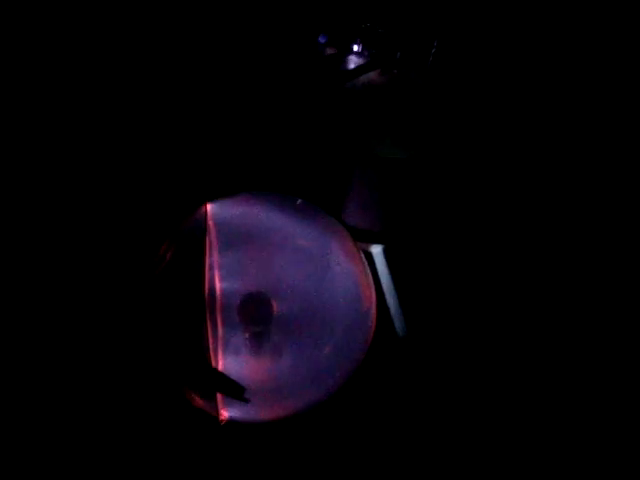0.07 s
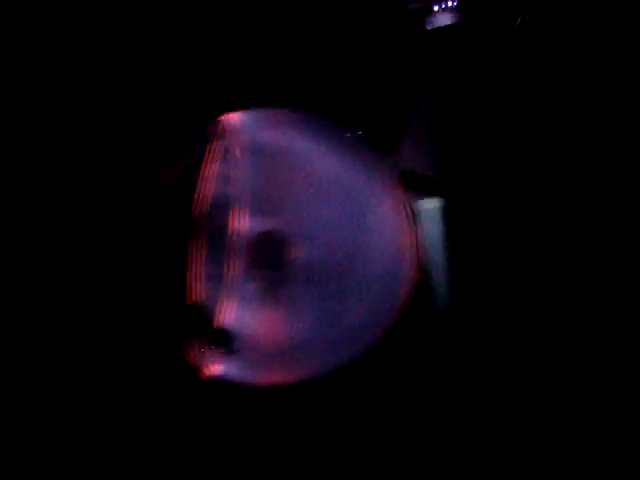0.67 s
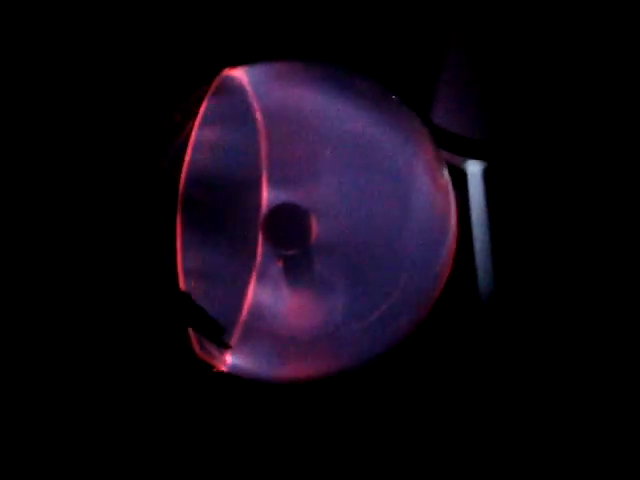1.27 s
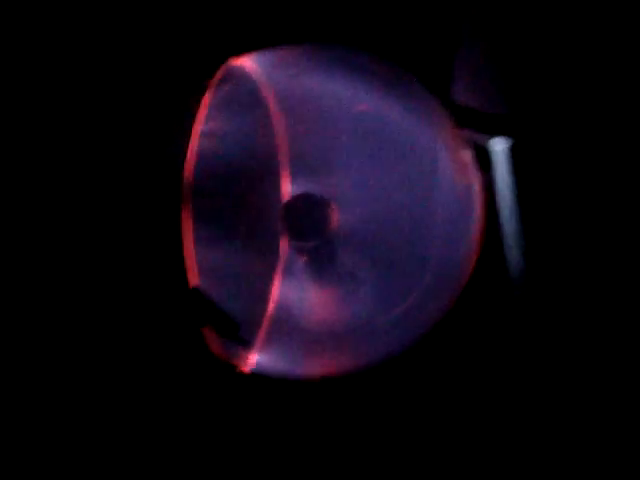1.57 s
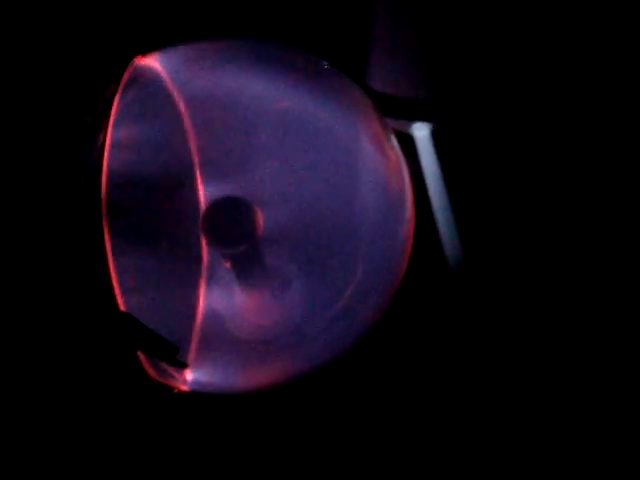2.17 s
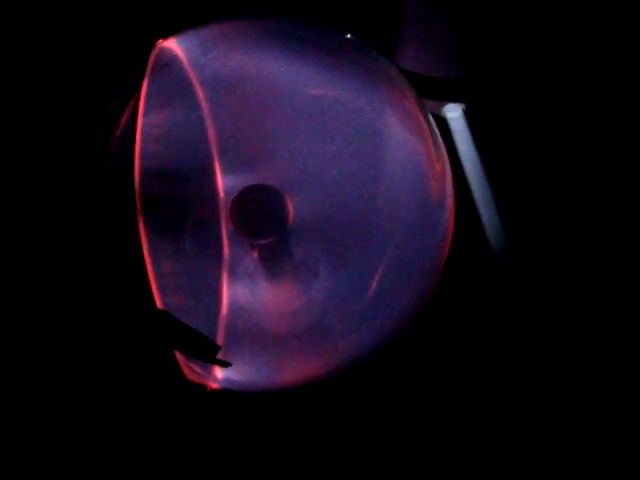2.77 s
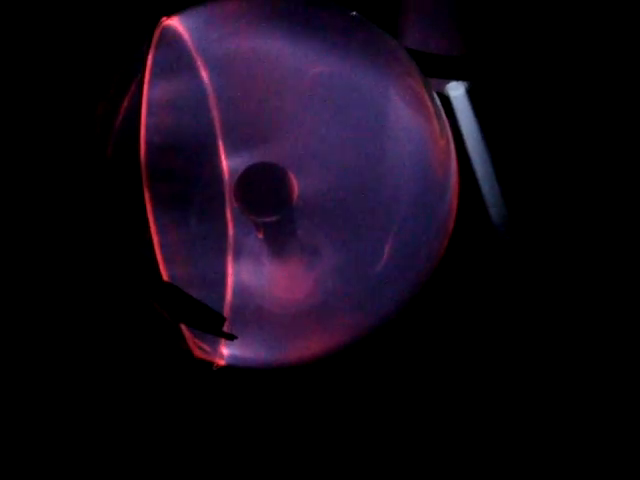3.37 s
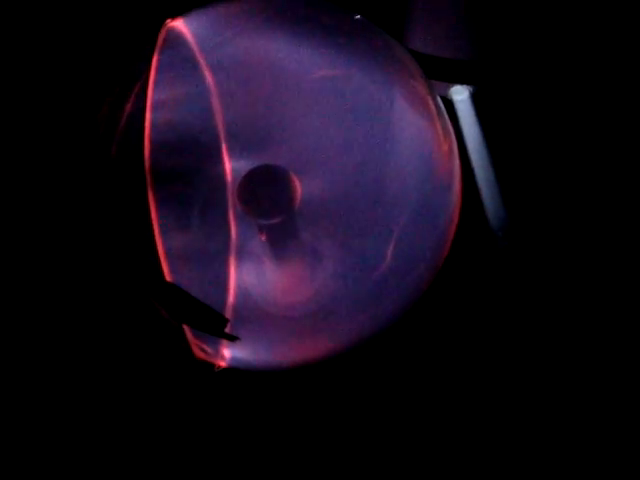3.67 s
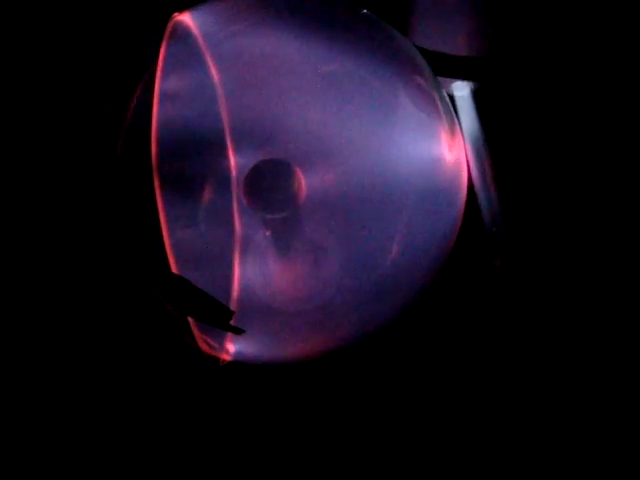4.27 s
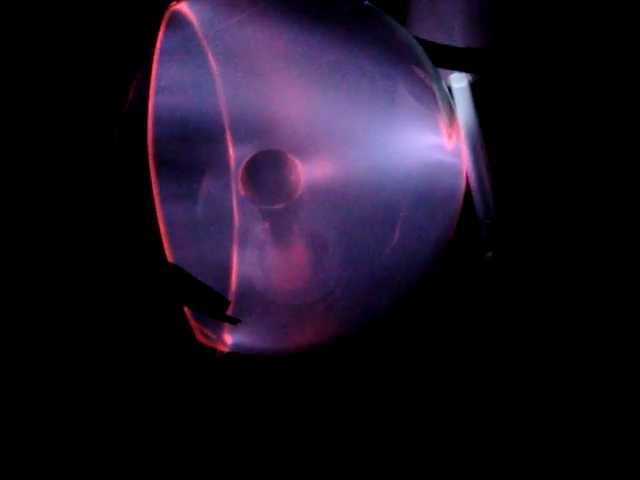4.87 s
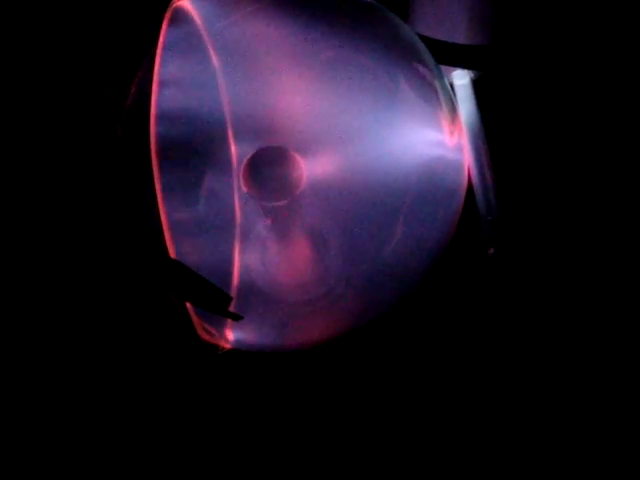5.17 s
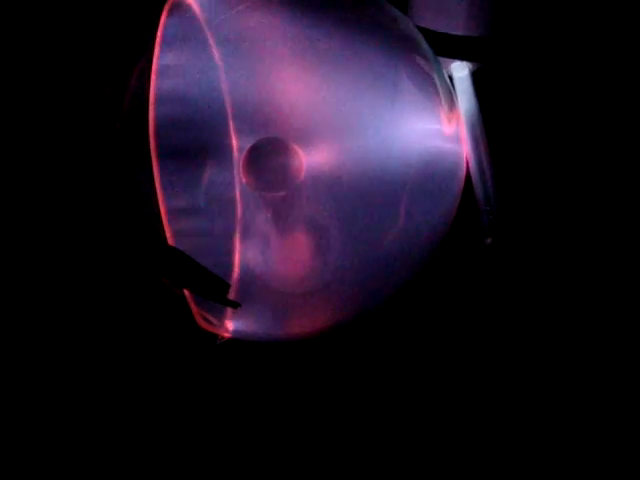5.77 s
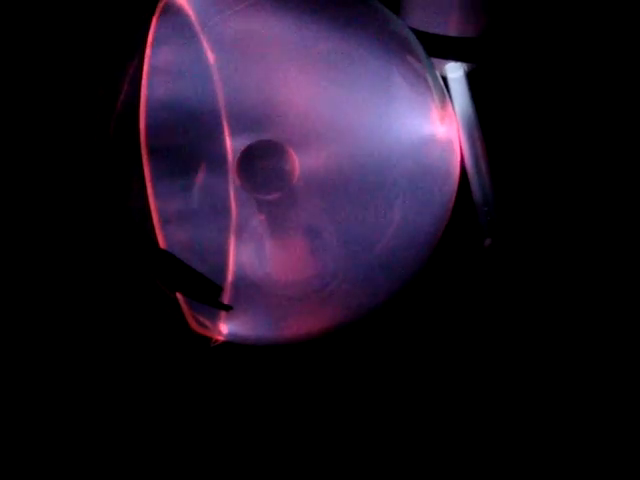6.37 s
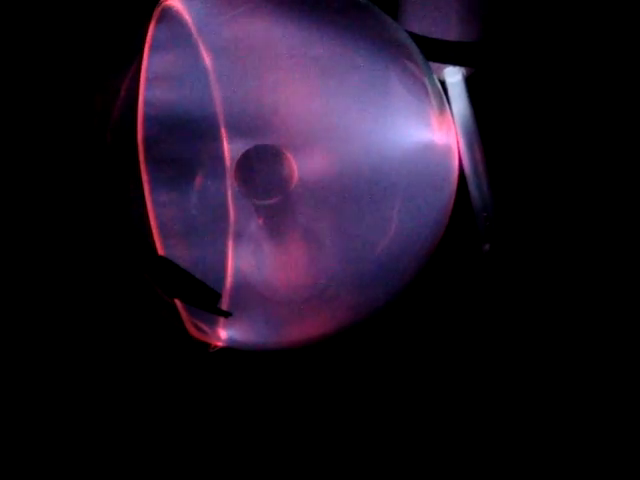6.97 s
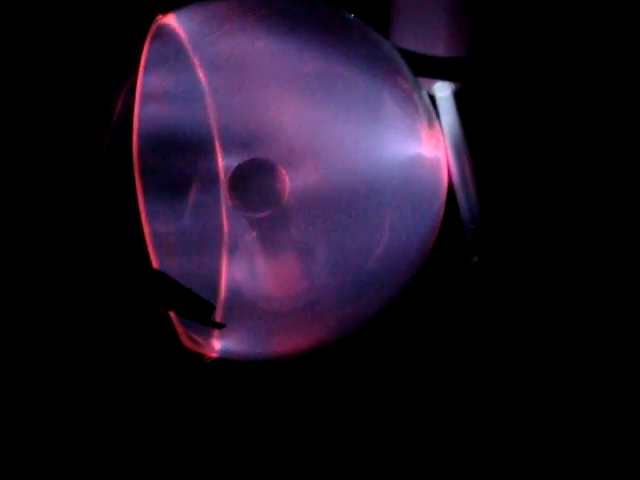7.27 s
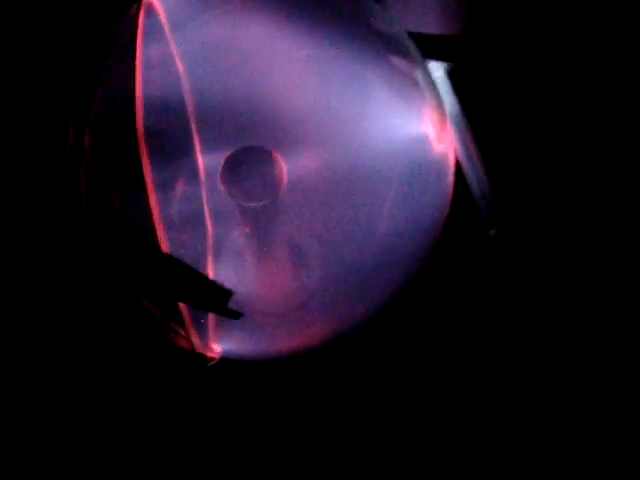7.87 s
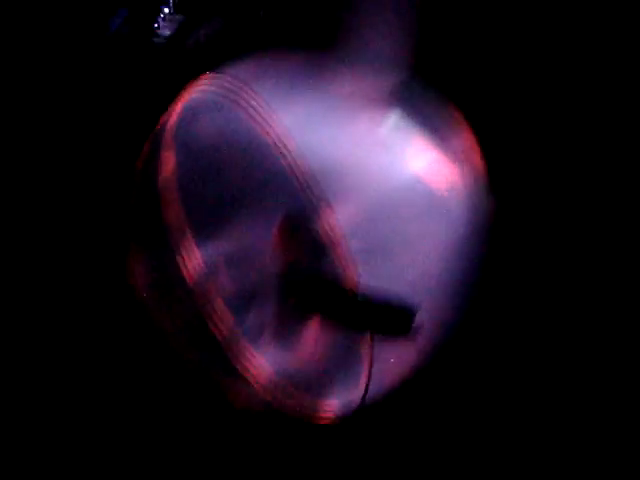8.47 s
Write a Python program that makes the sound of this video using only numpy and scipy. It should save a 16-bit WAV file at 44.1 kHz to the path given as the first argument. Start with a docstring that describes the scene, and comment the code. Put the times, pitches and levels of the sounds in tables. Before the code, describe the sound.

A thin electric buzz with a fizzy top runs without a break, made by rapid tiny sparks lighting a glass plasma bulb indoors. It grows a little louder as the nearby microphone moves, then abruptly changes tone and swells about halfway through. Small pops and scattered snaps dot the hiss, snapping hardest during a second, longer swell. Faint transformer hum and the rush of a small room sit behind it.

```python
"""A hissing buzz comes first: a mains-fed high-voltage supply sparks steadily while it lights a glass
bulb of plasma in a small room. Each half wave of the mains fires a few tiny sparks, which creep
earlier and drop out in turn. Their tone colour changes as the arc finds a new path and as the
microphone moves. Hot sparks push the air and pop; at times some snap harder and the arc flares.
A faint transformer hum and the noise of the room lie underneath."""
import sys
import numpy as np
from scipy import signal
from scipy.fft import rfft, irfft, next_fast_len
from scipy.io import wavfile
from scipy.ndimage import uniform_filter1d

SR = 44100
rng = np.random.default_rng(int(sys.argv[2]) if len(sys.argv) > 2 else 0)


def store_pcm(level_fs):
    """Save levels as 16-bit WAV."""
    pcm = np.round(np.clip(level_fs, -1, 1) * 32767).astype(np.int16)
    wavfile.write(sys.argv[1], SR, np.atleast_2d(pcm).T)


N = 384993
TIME = np.arange(N) / SR
HALF_WAVE_HZ, TOP_HZ = 120.2, 10090  # half waves of the mains a second; upper limit of the sound

# the part of each half wave in which sparks can fire: t/s, opens after/ms, lasts/ms
FIRING = [(0, 1.46, 3.6), (1.6, 1.59, 3.39), (3.88, 2.28, 3.67), (3.97, 0.58, 3.34), (4.58, 0.58, 3.3),
          (4.75, 0.71, 3.9), (5.95, .95, 3.82), (6.15, 1.19, 3.08), (7.6, 1.26, 3.58), (8.7, 1.87, 4)]
# tone colour of the spark's bright click and of its duller room echo: f/Hz, level/dB
DIRECT = [(500, -12.5), (1500, -5), (3200, -2.5), (4500, 2.5), (7000, -2), (8500, -1.5), (10000, -7.5)]
ROOM_TAIL = [(500, -12), (2000, -5), (4000, -1), (6500, -8), (8500, -8.5), (10000, -11.5)]
# broad tone colour of a spark at each of six stages: f/Hz, level/dB
FAR = [(450, -20), (900, -20.5), (1200, -12.9), (2200, -13.5), (3100, -10), (4200, -16), (5000, -16),
       (6000, -7.9), (7500, -5), (8900, -3), (10100, -11)]
NEAR = [(450, -19), (900, -21), (1200, -17), (2200, -14.5), (3100, -12), (4200, -12), (5000, -10.5),
        (6000, -6), (7500, 1.3), (8900, 8.5), (10100, -5.5)]
CLOSE = [(450, -18), (900, -23), (1200, -15), (2200, -9), (3100, -16), (4200, -8.5), (5000, -13.5),
         (6000, -6.5), (7500, -1), (8900, 6.7), (10100, 1.5)]
NEW_PATH = [(450, -22.5), (900, -19.4), (1200, -8), (2200, -20), (3100, -14.1), (4200, -1.1), (5000, -6),
            (6000, 5), (7500, -2.5), (8900, -2.5), (10100, -0.5)]
TURNING = [(450, -27), (900, -19), (1200, -11), (2200, -19.5), (3100, -18.5), (4200, -6.1), (5000, -5),
           (6000, -2), (7500, -2.5), (8900, 0.4), (10100, -0.5)]
TURNED = [(450, -21), (900, -19), (1200, -16.5), (2200, -17), (3100, -12), (4200, -12), (5000, -13),
          (6000, -8.5), (7500, -8.5), (8900, 6.5), (10100, 7)]
# peaks (+) and dips (-) in the buzz's tone colour at each stage: f/Hz, width/Hz, level/dB
FAR_PEAKS = [(660, 250, 3.5), (1810, 105, -4.9), (2222, 106, -4.8), (2720, 97, 1.5), (2970, 310, -8),
             (3630, 510, 6), (4270, 79, 8), (4700, 190, 8.5), (5610, 180, 7.5), (8800, 470, -12)]
NEAR_PEAKS = [(670, 68, 6.5), (1079, 126, 5), (1420, 380, 6), (1961, 130, 7), (2270, 120, 5.5),
              (2610, 288, 2.5), (3320, 60, 4.0), (3653, 590, 12), (4040, 104, 4.5), (4300, 82, 9.5),
              (4670, 81, 8.5), (5560, 600, 7.5), (8760, 430, -14)]
CLOSE_PEAKS = [(677, 100, 3.5), (1106, 120, 4), (1400, 260, 2.8), (1860, 56, -10), (2130, 77, -9.5),
               (2620, 93, 3.3), (2830, 76, 4), (3580, 740, 7.5), (4620, 180, 7), (5470, 210, 7.5),
               (6620, 180, -4.1), (8750, 310, -12)]
NEW_PATH_PEAKS = [(915, 69, -5), (1360, 146, -7), (1643, 200, 5.5), (1930, 77, 3.5), (2312, 430, 10.5),
                  (2904, 370, 7.5), (3569, 370, 3.5), (3750, 87, -2.5), (3970, 580, -6.5), (4100, 70, 6.5),
                  (4780, 71, -2), (4940, 96, 5.5), (6134, 340, -6), (6883, 187, -2.5), (7270, 49, -1.5),
                  (8159, 134, 7.5), (8930, 230, 2), (9844, 260, 9.5)]
TURNING_PEAKS = [(470, 112, 10), (1340, 150, -5), (1693, 305, 6.5), (2390, 359, 10.2), (2808, 257, 13.3),
                 (3227, 70, 3), (3487, 269, 4.5), (3675, 122, -3.6), (4330, 135, -3), (4940, 117, -4),
                 (7755, 191, 4.5)]
TURNED_PEAKS = [(764, 98, 4.0), (1090, 289, 7.9), (1800, 170, 9.5), (2400, 290, 12), (3114, 113, -5.7),
                (3237, 87, 6), (3840, 270, 7), (4450, 275, 8), (4963, 240, 12), (5702, 460, 12),
                (6337, 250, 9), (6950, 481, 13), (7640, 440, 10), (8676, 145, -9)]
# the stages in order: broad colour, peaks and dips
STAGES = [(FAR, FAR_PEAKS), (NEAR, NEAR_PEAKS), (CLOSE, CLOSE_PEAKS),
          (NEW_PATH, NEW_PATH_PEAKS), (TURNING, TURNING_PEAKS), (TURNED, TURNED_PEAKS)]
# low band (body) and top band (fizz) of the buzz at each stage: body level/dB, fizz level/dB
STAGE_BALANCE = [(-6.5, -2.5), (-6, -3), (-6, -1), (-9, -0.47), (-9, 0.5), (-10, -2)]
# changes from one stage to the next: start t/s, end t/s
STAGE_CHANGES = [(0.75, 1.34), (2.2, 2.9), (3.92, 3.99), (7.75, 8.03), (8.24, 8.38)]
# as the microphone moves, the echo paths change and the colour slides in pitch: t/s, shift/%
COLOUR_SLIDE = [(0, 0), (0.8, -0.27), (1.4, -0.72), (2.3, 0.89), (2.7, -0.65), (3.8, 0.94), (5.5, 0.019),
                (7, 0.18), (7.4, 0.3), (7.8, -1.1), (8.0, -2.8), (8.27, 1.8), (8.38, -1.3), (8.7, 0.52)]
# strength of the buzz at the microphone, flares aside: t/s, level/dB
STRENGTH = [(0, -48.5), (.75, -48), (1.0, -45.5), (1.25, -46), (1.52, -41.5), (1.95, -43), (2.4, -43),
            (3.75, -46.5), (4.1, -43), (5.05, -44), (5.95, -42), (7.4, -42), (7.7, -42.5), (8.1, -42.5),
            (8.3, -41), (8.73, -41)]
# spectra of a small pop, of the room's noise and of a hard snap: f/Hz, level/dB
POP_SPECTRUM = [(20, 0), (90, 4), (250, 5), (700, 2.5), (1100, -4), (2000, -19), (10000, -30)]
ROOM_SPECTRUM = [(15, -11), (35, -10), (70, -4), (150, -15), (300, -11), (700, 0.5), (2000, -11.5),
                 (10000, -23)]
SNAP_SPECTRUM = [(20, 16), (90, 25), (250, 26.5), (700, 27), (1500, 28), (3000, 28.5), (3800, 26),
                 (5000, 19), (10000, 14)]
# hard snaps, before their spectrum shapes them: t/s, level/dB
SNAPS = [(1.2495, -50), (1.925, -50), (2.0833, -49), (2.1145, -50), (2.2012, -50), (2.2406, -49.5),
         (2.2915, -46), (2.4974, -49), (2.8722, -49.5), (3.4578, -48), (4.0363, -49), (4.1212, -47.5),
         (4.287, -47), (4.4031, -50), (5.3935, -44), (5.576, -48), (5.968, -49), (6.0343, -49),
         (6.0923, -45), (6.2173, -44.5), (6.2838, -43.5), (6.3587, -48.5), (6.417, -39.5), (6.5005, -42.5),
         (6.5586, -46.5), (6.5996, -39.5), (6.875, -46), (6.9577, -46), (7.0825, -43), (7.3488, -43),
         (7.5072, -48.5), (7.5743, -50), (7.6576, -50), (7.7577, -48), (7.7737, -46), (8.0643, -45.5),
         (8.5804, -42)]
# flares of the arc and the resonance each feeds: start t/s, end t/s, swell/dB, f/Hz, boost/dB
FLARES = [(3.925, 4.6, 4, 7250, 2.5), (6.046, 7.85, 3.5, 5800, 0.5), (7.15, 7.46, 0.7, 4600, 0.5)]


def sparks(recharge_ms=1.3, scatter_ms=0.45, creep_ms=0.14, wander_ms=0.2, jitter_ms=0.05,
           edge_ms=0.46, fade_db_per_ms=0.47, uneven_db=1.7, stray_chance=0.15, stray_db=-11):
    """Times and sizes of the sparks: after each one the supply must recharge before it fires again."""
    start = np.arange(0, TIME[-1], 1 / HALF_WAVE_HZ)[:, None]
    opens_ms, length_ms = follow(FIRING, start)
    shape = (len(start), 6)  # a row for each half wave, with room for six sparks
    drift_ms = np.cumsum(wander_ms * rng.standard_normal(start.shape) - creep_ms, 0)
    scatter = unit_rms(uniform_filter1d(rng.standard_normal(shape), size=6, axis=0))
    wait_ms = abs(recharge_ms + scatter_ms * scatter)
    wait_ms[:, 0] = 0
    # a spark that creeps too early finds too little voltage, and the next takes the lead
    late_ms = drift_ms % recharge_ms + np.cumsum(wait_ms, 1) + jitter_ms * rng.standard_normal(shape)
    fires = np.clip((length_ms - late_ms) / edge_ms + rng.standard_normal(shape), 0, 1)
    sizes = fires * amp(uneven_db * rng.standard_normal(shape) - fade_db_per_ms * late_ms)
    times = start + (opens_ms + late_ms) / 1000
    # weak stray sparks fire at any moment of the half wave
    stray = (fires == 0) & (rng.random(shape) < stray_chance)
    times = np.where(stray, start + rng.random(shape) / HALF_WAVE_HZ, times)
    sizes = sizes + stray * amp(stray_db)
    # partly even out the energy of the half waves, however many sparks share it
    return times, sizes / (np.linalg.norm(sizes, axis=1, keepdims=True) + 1e-9) ** 0.48


def spark_at_spot(size=8192):
    """One spark: its click, the fizzle along its streak, echoes off the apparatus and the room."""
    click = click_with(read(DIRECT, bins(2 * size)))[:size]
    streak = amp(-6) * echoes(0.0021, size)
    apparatus = amp(-2) * echoes(0.0091, size)
    room = signal.fftconvolve(echoes(0.12, size), click_with(read(ROOM_TAIL, bins(size))))[:size]
    return click + streak + apparatus + room


def wandering_sparks(train, dwell_s=0.25, spots=5):
    """Sparks pass from spot to spot; each spot has its own fine echoes but no broad colour."""
    spot = np.floor(TIME / dwell_s + rng.random(N)) % spots
    out = np.zeros(N)
    for k in range(spots):
        response = spark_at_spot()
        broad_power = uniform_filter1d(abs(rfft(response)) ** 2, size=23)
        flatten = click_with(-10 * np.log10(broad_power))
        out += ring(ring(train * (spot == k), response), flatten)
    return out


def spark_colour(outline, peaks, hz, low_cut_hz=480):
    """Spectrum of a spark in dB: a thin click with peaks and dips in its tone colour."""
    peaks_db = sum(db / (1 + (2 * (hz - f) / width) ** 2) for f, width, db in peaks)
    bass_loss_db = 10 * np.log10(1 + (low_cut_hz / (hz + 20)) ** 4)
    return read(outline, hz) + peaks_db - bass_loss_db


def stage_at(t):
    """Number of the stage at the times t, with a fraction during a change."""
    return sum(ramp(t, start, end - start) for start, end in STAGE_CHANGES)


def shifting_colour(x, size=4096):
    """Colours the sparks piece by piece: stages blend, and peaks slide as the microphone moves."""
    hz, hop = bins(size), size // 2
    colours = [spark_colour(outline, peaks, hz) for outline, peaks in STAGES]
    padded, window = np.pad(x, (hop, 2 * size)), signal.windows.hann(size, sym=False)
    out = np.zeros(N + 3 * size)
    for at in range(0, N + hop, hop):
        stage = stage_at(at / SR)
        stretch = 1 + follow(COLOUR_SLIDE, at / SR)[0] / 100
        db = sum(max(1 - abs(stage - k), 0) * colour for k, colour in enumerate(colours))
        response = click_with(np.interp(hz / stretch, hz, db))
        piece = signal.fftconvolve(padded[at:at + size] * window, response)
        out[at:at + len(piece)] += piece
    return out[hop:hop + N]


def band_levels(t, usual_db=-43):
    """Body, middle and fizz in dB: the middle follows strength and flares fully, the others partly."""
    excess = follow(STRENGTH, t)[0] - usual_db
    swell = sum(db * flare(t, start, end) for start, end, db, _, _ in FLARES)
    body, fizz = [np.interp(stage_at(t), range(len(STAGES)), db) for db in np.transpose(STAGE_BALANCE)]
    return (usual_db + body + 0.76 * excess + 0.4 * swell,
            usual_db + excess + swell,
            usual_db + fizz + 0.73 * excess + 0.62 * swell)


def buzz(times, sizes, waver_db=0.32, fizz_waver_db=0.75):
    """The quick sparks merge into a hissing buzz that swells with the strength of the arc."""
    sound = shifting_colour(wandering_sparks(clicks(times, sizes)))
    size = next_fast_len(N)
    spectrum = rfft(flare_resonance(sound), size)
    body, middle, fizz = band_levels(TIME)
    # band 0 is the body, 1 the middle, 2 the fizz; 3 is left silent
    band = np.interp(bins(size), [3800, 4200, 7600, 8400, TOP_HZ, TOP_HZ + 100], [0, 1, 1, 2, 2, 3])
    out = np.zeros(N)
    for k, db in enumerate([body, middle, fizz + fizz_waver_db * waver()]):
        part = irfft(spectrum * np.maximum(1 - abs(band - k), 0), size)[:N]
        power = signal.oaconvolve(part ** 2, signal.windows.hann(SR // 5), "same") / (SR // 10)
        out += part / np.sqrt(abs(power) + 1e-20) * amp(db)  # steady the band, then set its level
    return out * amp(waver_db * waver())


def small_pops(times, sizes, base_db=-37.5, spread_db=6, hottest_db=8):
    """Hotter sparks push the air as well, making many small, dull pops."""
    body, _, _ = band_levels(times)
    drive_db = 0.94 * (body - np.mean(body))
    heat_db = np.minimum(spread_db * rng.standard_normal(times.shape), hottest_db)
    push = rng.choice([-1, 1], times.shape) * sizes * amp(base_db + drive_db + heat_db)
    return ring(clicks(times, push), click_with(read(POP_SPECTRUM, bins(8192))))


def transformer_hum(level_db=-79, octave_db=-6):
    """The transformer hums at the rate of the half waves, with a weaker tone an octave up."""
    angle = 2 * np.pi * HALF_WAVE_HZ * TIME
    return np.sqrt(2) * amp(level_db) * (np.sin(angle) + amp(octave_db) * np.sin(2 * angle))


def room_noise(level_db=-70):
    """The room gives a soft, steady rush."""
    air = irfft(rfft(rng.standard_normal(N)) * amp(read(ROOM_SPECTRUM, bins(N))), N)
    return amp(level_db) * unit_rms(air)


def hard_snaps():
    """A few hot sparks push the air hard and crack from bass to treble."""
    times, db = np.transpose(SNAPS)
    return ring(clicks(times, -amp(db)), click_with(read(SNAP_SPECTRUM, bins(8192))))


def flare(t, start, end, rise_s=0.055, fall_s=0.11):
    """The arc flares up from 0 to 1, holds and falls back."""
    return ramp(t, start, rise_s) - ramp(t, end, fall_s)


def flare_resonance(x, width_hz=700):
    """In each flare, the resonance that the arc feeds most swells out of the hiss."""
    decay = np.exp(-np.pi * width_hz / SR)
    out = x.copy()
    for start, end, _, hz, boost_db in FLARES:
        ringing = 2 * signal.lfilter([1 - decay], [1, -decay * np.exp(2j * np.pi * hz / SR)], x).real
        out += (amp(boost_db * flare(TIME, start, end)) - 1) * ringing
    return out


def amp(db):
    """Turns decibels into a gain."""
    return 10 ** (np.asarray(db) / 20)


def unit_rms(x):
    """Scales x to an average (rms) size of 1."""
    return x / np.sqrt(np.mean(x ** 2) + 1e-20)


def read(points, hz):
    """Reads a spectrum table at hz, with octaves evenly spaced."""
    f, db = np.transpose(points)
    return np.interp(np.log(hz + 1), np.log(f), db)


def follow(rows, t):
    """Reads each column of a time table at the times t."""
    times, *columns = np.transpose(rows)
    return [np.interp(t, times, column) for column in columns]


def bins(size):
    """Frequencies in the spectrum of that many samples."""
    return np.fft.rfftfreq(size, 1 / SR)


def click_with(db):
    """The sharpest click that has this spectrum: all its ringing comes after the attack."""
    log_gain = np.log(amp(np.r_[db, db[-2:0:-1]]))
    return np.fft.ifft(np.exp(np.conj(signal.hilbert(log_gain)))).real[:len(db)]


def ring(x, response):
    """Makes every sample of x set off the response."""
    return signal.oaconvolve(x, response)[:N]


def clicks(times, sizes):
    """A one-sample click at each time."""
    at = np.clip(np.round(times * SR).astype(int), 0, N - 1)
    return np.bincount(at.ravel(), (sizes * (times < TIME[-1])).ravel(), N)


def echoes(fade_s, size=8192):
    """Dense echoes of energy 1 that build up quickly and fall 60 dB in fade_s."""
    t = np.arange(size) / SR
    build_up = 1 - np.exp(-t / (fade_s / 20))
    tail = rng.standard_normal(size) * amp(-60 * t / fade_s) * build_up
    return tail / np.linalg.norm(tail)


def ramp(t, start, length):
    """Rises from 0 to 1 over that length of time."""
    return np.clip((t - start) / length, 0, 1)


def waver(rate_hz=6.4):
    """A slow random wobble with an average size of 1."""
    return unit_rms(irfft(rfft(rng.standard_normal(N)) * np.exp(-(bins(N) / rate_hz) ** 2), N))


def scene():
    """The buzz, the pops and snaps with their echo, the hum and the room at one microphone."""
    times, sizes = sparks()
    hiss = buzz(times, sizes)
    pops = small_pops(times, sizes) + hard_snaps()
    pop_echo = amp(-12) * ring(pops, echoes(fade_s=0.11))
    return (hiss + pops + pop_echo + transformer_hum() + room_noise())[None]


def record(dry):
    """Cuts off the treble above TOP_HZ."""
    low_pass = signal.firwin(801, TOP_HZ, window=("kaiser", 8), fs=SR)
    return signal.oaconvolve(dry, low_pass[None], "same")


dry = scene()
out = record(dry)
store_pcm(out)
```